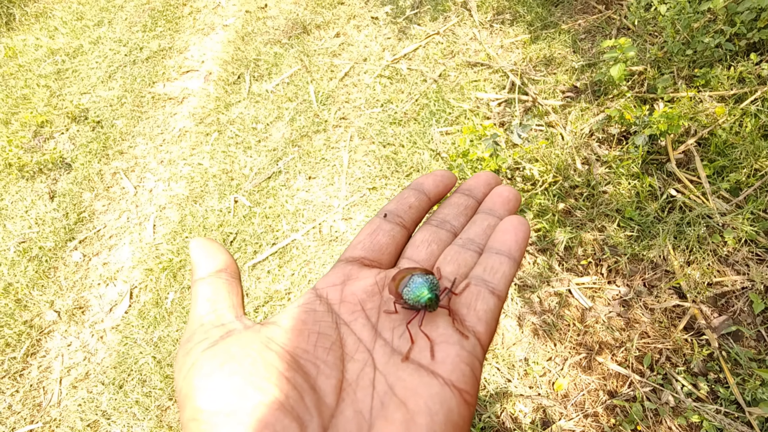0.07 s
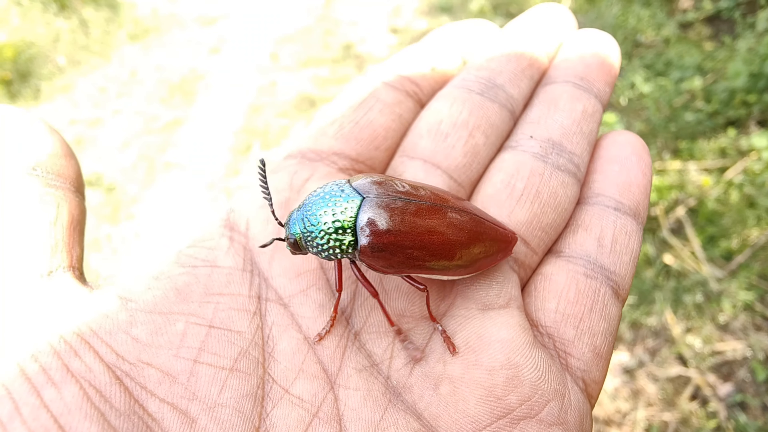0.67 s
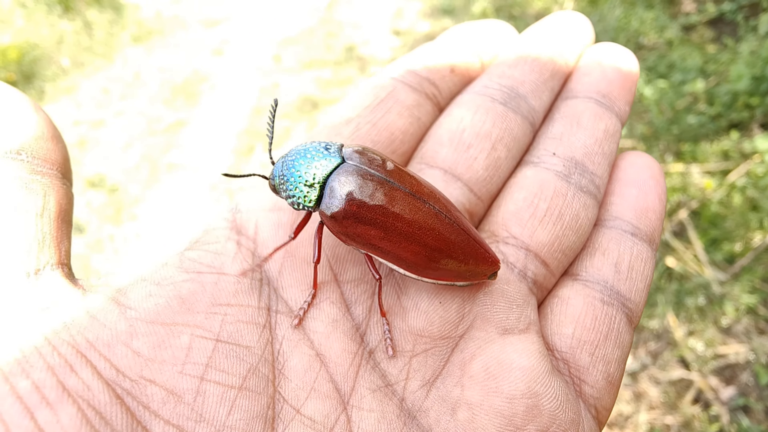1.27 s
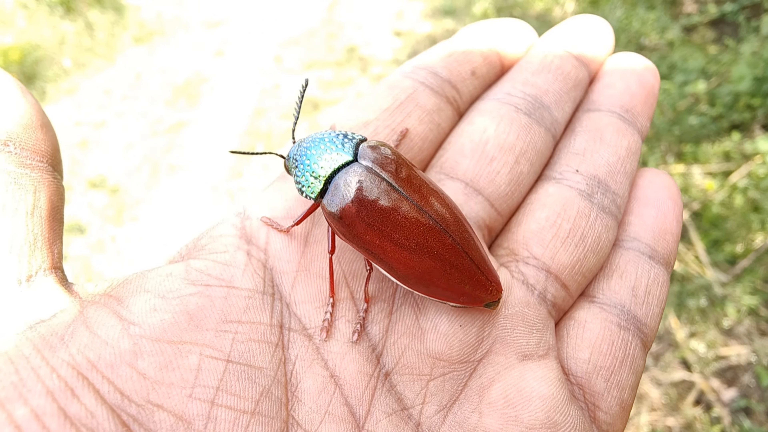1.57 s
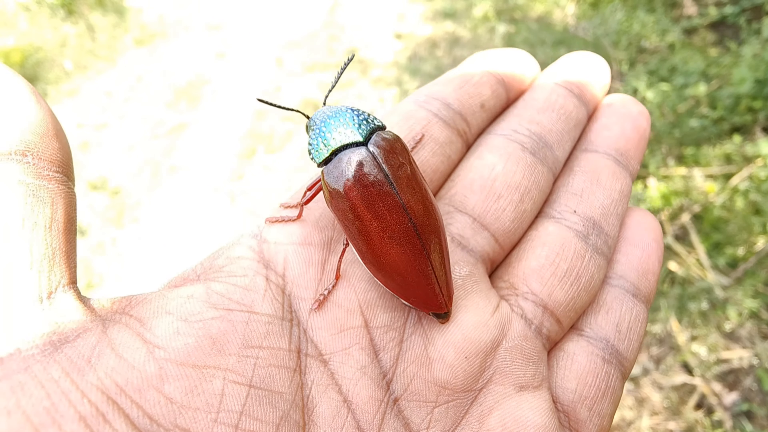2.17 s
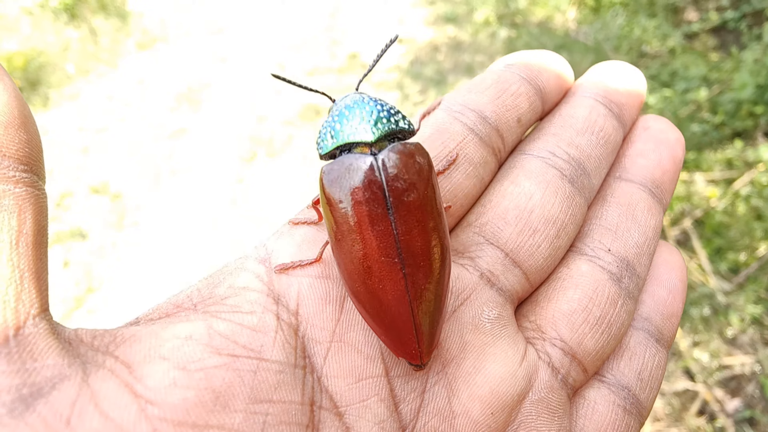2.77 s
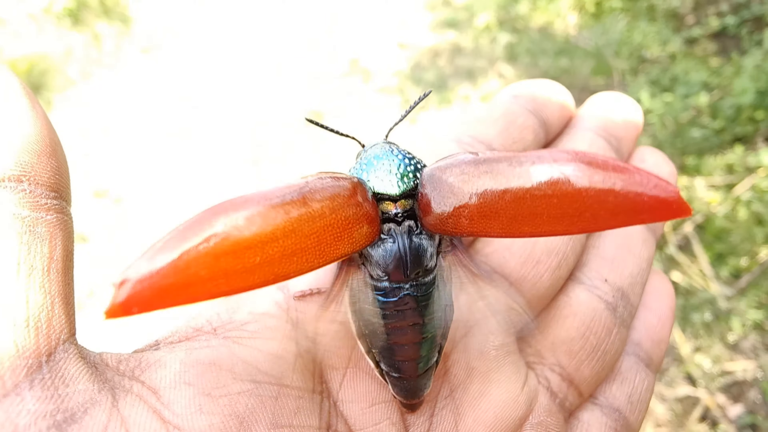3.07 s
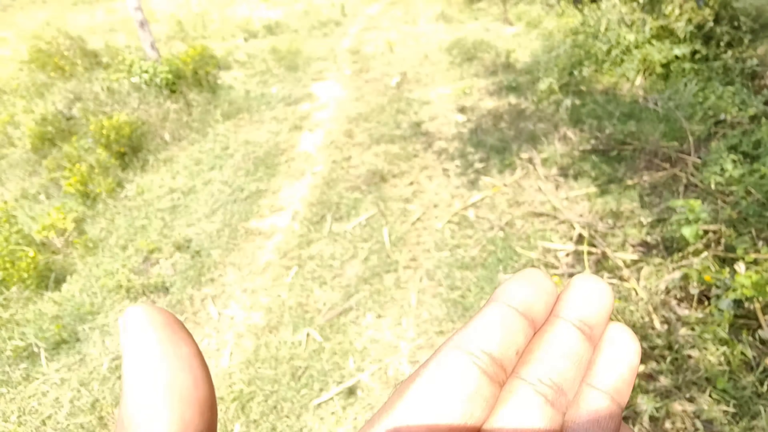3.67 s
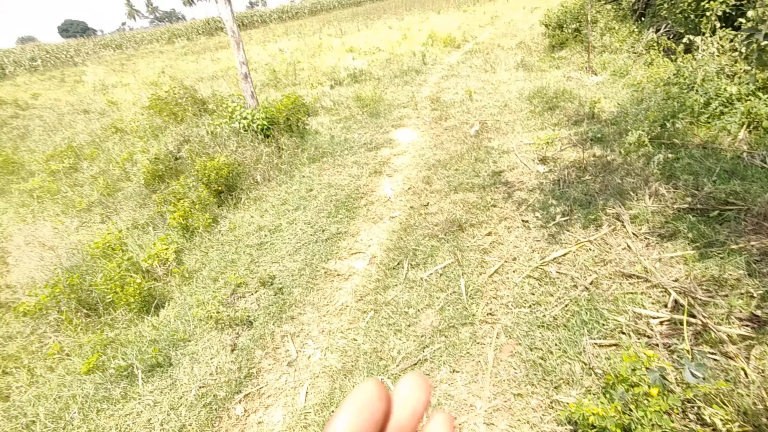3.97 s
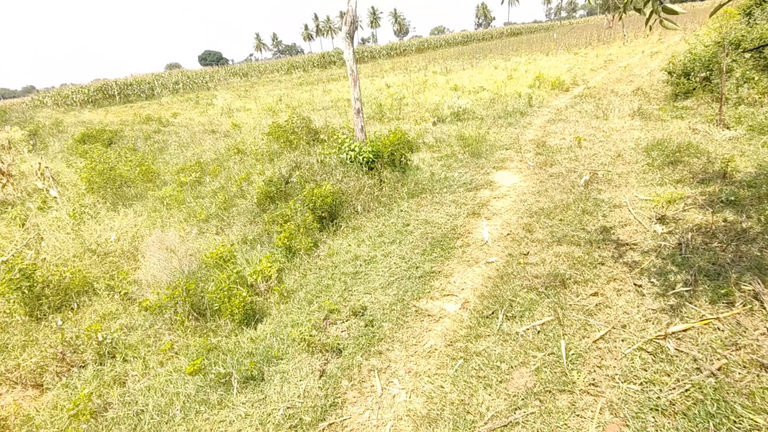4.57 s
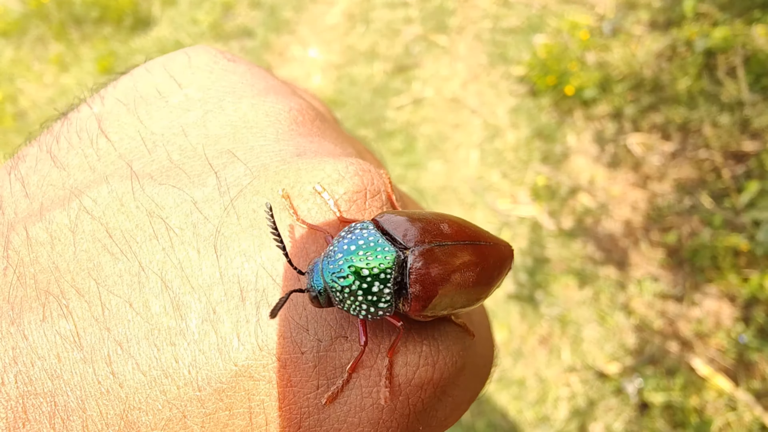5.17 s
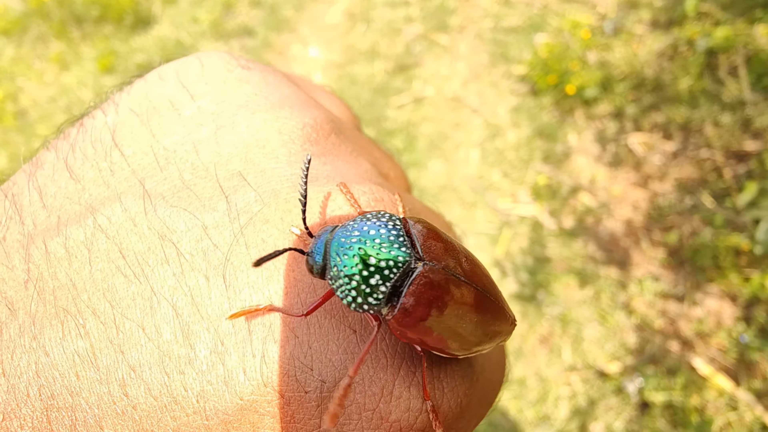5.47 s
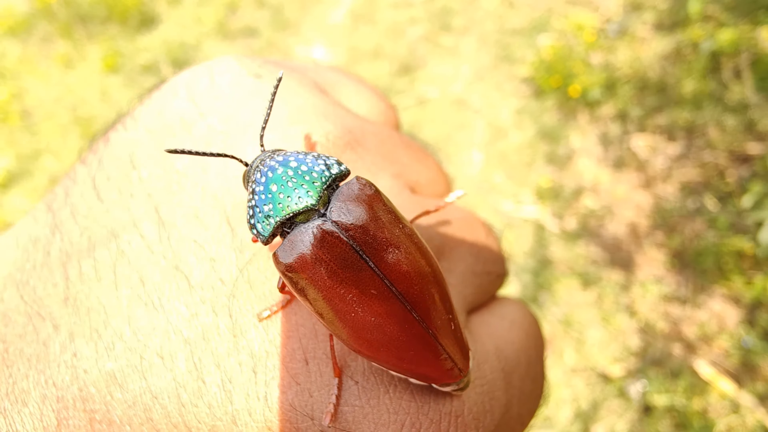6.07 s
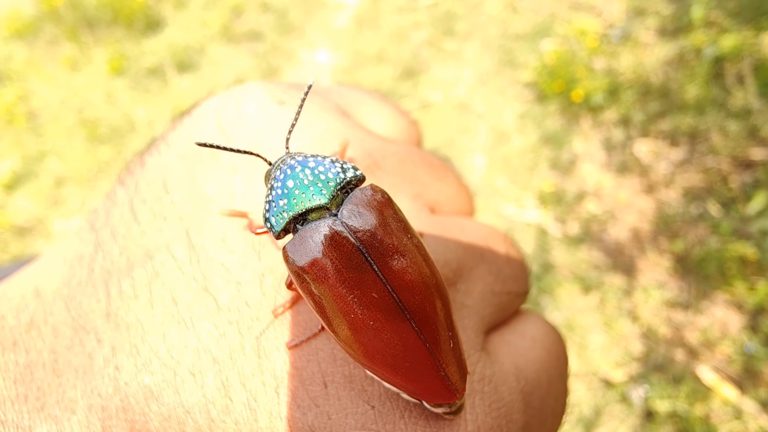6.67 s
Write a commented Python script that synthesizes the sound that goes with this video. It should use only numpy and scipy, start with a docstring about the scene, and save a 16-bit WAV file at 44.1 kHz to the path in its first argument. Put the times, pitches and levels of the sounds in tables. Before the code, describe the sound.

A cricket and far birds call faintly in the open air, with light wind rumble. Midway, a few crisp clicks lead into the close, rasping whirr of a big beetle taking flight, which quickly recedes to the left. Wind thumps unevenly on the microphone, mixed with brief finger rubs and bumps on the right, then eases back toward the quiet of the field.

```python
"""A large beetle opens its wing cases on a palm, whirrs past the microphone and flies off over a field.
Each wingbeat radiates a pressure pulse and rasps at its two reversals; both fade with distance.
A faint flight hum is also heard at the very start. Turbulent wind and rubbing, knocking fingers
disturb the two microphone ports, while a cricket and far birds call over the quiet air."""
import sys
import numpy as np
from scipy import signal
from scipy.fft import rfft, irfft, next_fast_len
from scipy.io import wavfile
from scipy.ndimage import uniform_filter1d, map_coordinates

SR = 44100
rng = np.random.default_rng(int(sys.argv[2]) if len(sys.argv) > 2 else 0)


def transcribe(signal):
    """Save signal, clipped to [-1, 1], as a 16-bit WAV file at the path in sys.argv[1]."""
    frames = np.atleast_2d(signal).T
    limited = np.clip(frames, -1, 1)
    pcm = np.round(limited * 32767).astype(np.int16)
    wavfile.write(sys.argv[1], SR, pcm)


N = 300321
T = np.arange(N) / SR


def amp(db):
    """Amplitude ratio of a level in decibels."""
    return 10 ** (np.asarray(db) / 20)


def unit(x):
    """Normalises a signal to rms 1."""
    return x / np.sqrt(np.mean(x ** 2) + 1e-20)


def level_at(spectrum, hz):
    """Interpolates a spectrum over log frequency."""
    known_hz, db = np.transpose(spectrum)
    return np.interp(np.log(hz + 1), np.log(known_hz + 1), db)


def curves(rows):
    """Interpolates each column of a table over the times in its first."""
    times, *columns = np.transpose(rows)
    return [np.interp(T, times, column) for column in columns]


def during(rows):
    """A gate open for the time span of a table, with short fades."""
    start, end = rows[0][0], rows[-1][0]
    return np.interp(T, [start - .01, start, end, end + .006], [0, 1, 1, 0])


def envelope(start, length, attack_s, release_s):
    """Rises linearly until start, holds for length, then decays exponentially."""
    rise = np.clip(1 + (T - start) / attack_s, 0, 1)
    return rise * np.exp(-np.clip((T - start - length) / release_s, 0, 20))


def pan(balance_db):
    """Two gains of mean 1; balance is the level of the left port over the right."""
    left = np.atleast_1d(amp(balance_db))
    return 2 * np.array([left, np.ones_like(left)]) / (1 + left)


def noise(spectrum, shared=0., balance=((100, 0), (1000, 0))):
    """Partly coherent coloured noise at two ports; their average has rms 1."""
    size = next_fast_len(N, True)
    hz = np.fft.rfftfreq(size, 1 / SR)
    white = rfft(rng.standard_normal((3, size)))
    ports = np.sqrt(shared) * white[2] + np.sqrt(1 - shared) * white[:2]
    coloured = irfft(ports * amp(level_at(spectrum, hz)) * pan(level_at(balance, hz)), size)[:, :N]
    return coloured / coloured.mean(0).std()


def wander(per_s):
    """A random fluctuation of rms 1, drawn anew per_s times a second and interpolated."""
    knots = rng.standard_normal(N // 8)
    return unit(np.interp(T * per_s, np.arange(len(knots)), knots))


def add(mix, start, sound):
    """Superposes a stereo sound on the mix from start, in seconds."""
    part = mix[:, max(round(start * SR), 0):][:, :sound.shape[1]]
    part += sound[:, :part.shape[1]]


def flap(tone, beat_hz, aspect, phase, size=1024):
    """Directivity: each beat is a minimum-phase pulse shaped by aspect, 0 from above to 1 from behind."""
    hz, tone = np.arange(size // 2 + 1) * beat_hz, np.array(tone)
    above_db, behind_db = level_at(tone[:, :2], hz), level_at(tone[:, ::2], hz)
    shapes = []
    for share in np.linspace(0, 1, 10):
        log_gain = np.log(amp((1 - share) * above_db + share * behind_db))
        mirrored = np.r_[log_gain, log_gain[-2:0:-1]]
        partials = np.exp(np.conj(signal.hilbert(mirrored)))[:len(hz)]
        shapes.append(unit(irfft(partials * (hz > 0) * (hz < tone[-1, 0]), size)))
    shape_index = np.clip(aspect, 0, 1) * (len(shapes) - 1)
    return map_coordinates(np.array(shapes), [shape_index, phase * size], order=1, mode="nearest")


def wings(flying, beat_hz, aspect, hum_db, push_db, rasp_db, tone, rasp_tone, *, lag_s, rattle_db,
          hum_pan_db, push_pan_db, rasp_pan_db, rasp_shared, width_beats, upstroke, steady):
    """Beating wings radiate a harmonic hum, push air in the near field and rasp at each reversal."""
    # Wings brushing the raised cases. Each row: frequency in Hz, relative density in dB.
    rattle_tone = [(1500, -16), (2500, -7), (3000, -5), (3900, -15), (4700, -19), (8000, -31)]
    # Direction of the membranes' rasp. Each row: frequency in Hz, balance in dB.
    rasp_balance = [(1000, 15.5), (2400, 3), (4400, 0), (8100, 11.5), (15000, 3.5)]
    full_stroke_hz, crackle_db, octave_db = 71, 4, -22
    beats = np.cumsum(beat_hz * (1 + .002 * wander(60) * flying)) / SR
    phase = beats % 1
    # No two beats flex the wing alike.
    hum = flap(tone, beat_hz.mean(), aspect + .03 * wander(70), phase) * amp(hum_db + .4 * wander(70))
    push = unit(np.cos(2 * np.pi * beats) + amp(octave_db) * np.cos(4 * np.pi * beats)) * amp(push_db)
    # The lower reversal snaps only once the wings swing fully.
    downstroke = np.clip(1 + (beat_hz - full_stroke_hz) / 8, 0, 1)
    lower = downstroke * np.exp(-.5 * (((phase + .5) % 1 - .5) / width_beats) ** 2)
    upper = upstroke * np.exp(-.5 * ((phase - .5) / width_beats) ** 2)
    bursts = steady + lower + upper
    crackle = unit(amp(crackle_db * wander(2500)))
    rasp_gain = bursts / bursts.mean() * crackle * amp(rasp_db + .63 * wander(140))
    # The papery rattle carries upwards more than backwards.
    rattle = noise(rattle_tone, rasp_shared) * amp(rattle_db - 10 * aspect)
    rasp = (noise(rasp_tone, rasp_shared, rasp_balance) + rattle) * rasp_gain
    # A close hum favours the left port; far off it is heard more evenly.
    closeness = amp(.93 * (hum_db - hum_db.max()))
    ports = rasp * pan(rasp_pan_db) - hum * pan(hum_pan_db * closeness) - push * pan(push_pan_db)
    left, right = flying * ports
    return np.array([left, map_coordinates(right, [(T - lag_s) * SR])])


def far_flight():
    """Periodic wing strokes some way off radiate a faint hum that soon stops."""
    # The flight. Each row: time in seconds, beat rate in Hz, level in dB, aspect from 0 to 1.
    flight = [(0, 66.6, -53, 0), (.24, 66.8, -56.5, .09), (.35, 66.4, -59.5, .98), (.43, 66, -71, .8)]
    # Stroke spectrum. Each row: frequency in Hz, relative dB from above, relative dB from behind.
    tone = [(66, 1, -26), (133, -3, -24), (198, -2.5, -15), (265, 2.5, -9), (336, -3, -6.5),
            (400, -13.5, -22), (475, 3.5, -11), (520, 3, 5.5), (606, -10, -25), (730, -50, -11),
            (1800, -35, -20), (2450, -18, -18), (3100, -32, -31), (5000, -30, -25)]
    # Membrane noise. Each row: frequency in Hz, relative density in dB.
    rasp_tone = [(900, 0.5), (1900, -11), (2450, 5), (3100, -19), (4400, -6), (6200, -9.5), (8000, -7.5),
                 (12000, -13), (15800, -24)]
    beat_hz, hum_db, aspect = curves(flight)
    push_db, rasp_db = hum_db - 20, hum_db - 10
    return wings(during(flight), beat_hz, aspect, hum_db, push_db, rasp_db, tone, rasp_tone,
                 lag_s=-.00027, rattle_db=-23, hum_pan_db=2, push_pan_db=-6, rasp_pan_db=-7,
                 rasp_shared=.11, width_beats=.041, upstroke=.16, steady=.23)


def open_air(hush_db=-68.5):
    """Broadband ambient noise: a steady hush and a far breeze that slowly swells and sinks."""
    # Quiet air and the breeze. Each row: frequency in Hz, relative density in dB.
    hush_tone = [(88, -34), (150, -8), (361, -6.5), (817, -15), (2630, -14), (5000, -19), (5410, -22),
                 (6700, -24), (14600, -27), (15800, -22)]
    breeze_tone = [(150, 10), (400, 8.5), (800, 5.5), (1200, 0.5), (2500, -19)]
    # Strength of the breeze. Each row: time in seconds, level in dB.
    breeze_level = [(0, -67), (2.9, -65), (4.5, -61.5), (5.4, -68.5)]
    # Direction of the hush. Each row: frequency in Hz, balance in dB.
    balance = [(300, 5.5), (800, -2), (2400, -2), (8000, 3.5), (15000, -1.5)]
    hush = noise(hush_tone, .056, balance) * amp(hush_db + .5 * wander(39))
    breeze = noise(breeze_tone, shared=.31) * amp(curves(breeze_level)[0] + wander(6.7))
    return hush + breeze * pan(-3)


def cricket(pitch_hz=5400, sag_hz=400, strokes_per_s=35, level_db=-62.5, fade_db_per_s=1.8):
    """Stridulation: four wing strokes make a chirp, each sagging in pitch, the last one weak."""
    # Runs of chirps. Each row: start, end and period in seconds, level in dB relative to the first run.
    runs = [(.005, .6, .177, 0), (.734, 1, .176, -5), (1.162, 3, .192, -2.5), (4.585, 5.35, .221, -3.5),
            (5.435, 6.2, .171, -4.5), (6.33, 6.8, .205, -7)]
    out = np.zeros((2, N))
    stroke = np.arange(0, 4, strokes_per_s / SR)
    tooth_jitter_hz = 55 * wander(700)
    swell = np.sin(np.pi * stroke) ** 2 * np.interp(stroke, [0, 2.6, 4], [.9, 1, .3])
    for start, end, period, db in runs:
        for onset in np.arange(start, end, period):
            jitter_hz = tooth_jitter_hz[int(onset * SR / 2):][:len(stroke)]
            hz = pitch_hz + sag_hz * (.5 - stroke % 1) + jitter_hz
            gain = amp(level_db + db - fade_db_per_s * (onset - start))
            add(out, onset, gain * pan(0) * swell * np.sin(2 * np.pi * np.cumsum(hz) / SR))
    return out


def scatter(calls, wet_db, t60_s):
    """Reverberation: bushes and ground scatter distant calls into an exponentially decaying tail."""
    t = np.arange(SR // 2) / SR
    tail = rng.standard_normal((2, len(t))) * amp(-60 * t / t60_s)
    tail /= np.linalg.norm(tail[0])
    return calls + amp(wet_db) * signal.fftconvolve(calls, tail, axes=1)[:, :N]


def wind(draught_rumble_db=-47.5, draught_buffet_db=-64.5, swell_db=-.36, swells_per_s=5.4):
    """Turbulence at the ports rumbles and buffets; gusts and a light draught add in power."""
    # Gusts. Each row: start and length in seconds, then rumble, buffeting and balance in dB.
    gusts = [(0.309, 0.21, -36.5, -57, 19), (1.196, 0.23, -47, -80, 6), (1.552, 0.058, -39, -74, 19),
             (2.619, 0.078, -40.5, -57, 11), (2.911, 0.14, -43.5, -61, 11), (3.498, 0.049, -33, -47, 20.5),
             (3.584, .15, -23.5, -30, 26), (3.949, 0.49, -37.5, -61, 14), (4.04, 0.0083, -31, -32, 29),
             (4.103, 0.044, -29, -43.5, 28), (4.186, 0.0098, -30.5, -39.5, 25), (4.28, 0.051, -30, -39, 28),
             (4.503, 0.11, -28.5, -50, -14), (4.904, 0.11, -23.5, -37.5, 10), (4.945, 0.026, -34, -25, 28),
             (5.015, 0.018, -16, -28, 13.5), (5.086, 0.056, -27.5, -30, -13),
             (5.123, 0.025, -22.5, -39, 13), (5.179, 0.028, -18, -27.5, -3.5),
             (5.221, 0.083, -33.5, -43, 4.5), (5.492, 0.25, -46, -82, 28), (5.874, 0.05, -32, -45, 26),
             (5.944, 0.15, -36, -60.5, 26), (6.12, 0.092, -43.5, -73, 16)]
    # Low rumble and brighter buffeting. Each row: frequency in Hz, relative density in dB.
    rumble_tone = [(10, -6.5), (25, 2.5), (45, -1.5), (65, -5.5), (100, -20), (200, -43.5), (500, -86)]
    buffet_tone = [(30, -47), (70, 1.5), (110, 3.5), (180, -4.5), (280, -19.5), (450, -29), (900, -87),
                   (2000, -85)]
    swell = amp(swell_db * np.array([wander(swells_per_s), wander(swells_per_s)]))
    rumble_power = (amp(draught_rumble_db) * swell) ** 2
    buffet_power = (amp(draught_buffet_db) * swell) ** 2
    for start, length, rumble_db, buffet_db, balance_db in gusts:
        power = (pan(balance_db) * envelope(start, length, attack_s=.014, release_s=.019)) ** 2
        rumble_power += amp(rumble_db) ** 2 * power
        buffet_power += amp(buffet_db) ** 2 * power
    eddies = np.array([noise(rumble_tone, shared=.41), noise(buffet_tone, shared=.045)])
    # The eddies are evened out, so that the gusts set their strength.
    rumble, buffet = eddies / np.sqrt(uniform_filter1d(eddies ** 2, size=3000, axis=-1) + .06)
    return rumble * np.sqrt(rumble_power) + buffet * np.sqrt(buffet_power)


def birds(waver=.0364, chorus_db=-80, chorus_count=30):
    """Frequency-modulated tones: short wavering slurs over a random chorus of fainter ones."""
    # Far calls. Each row: start and length in seconds, first and last pitch in Hz, level in dB.
    slurs = [(0.449, 0.045, 2820, 2590, -65), (1.019, 0.05, 1730, 2070, -66),
             (1.464, 0.065, 2400, 2235, -68), (1.703, 0.061, 2406, 1990, -65.5),
             (1.722, 0.077, 2020, 1620, -67), (2.06, 0.025, 1376, 1460, -64.5),
             (4.403, 0.027, 2830, 2430, -60), (4.62, 0.14, 2220, 2430, -65.5),
             (4.73, 0.063, 3090, 3240, -64.5), (5.154, 0.085, 3560, 3720, -67),
             (5.559, 0.071, 2590, 2425, -54.5), (5.79, 0.034, 2215, 2300, -65.5),
             (5.834, 0.082, 2446, 2770, -66), (5.878, 0.037, 5100, 5000, -67),
             (6.543, .06, 3270, 2840, -72)]
    out, wobble = np.zeros((2, N)), wander(300)
    chorus = []
    for when, duration, pitch, glide in rng.random((chorus_count, 4)):
        hz = 1800 + 2000 * pitch
        chorus.append((when * (T[-1] - .2), .03 + .04 * duration, hz, hz * (.88 + .24 * glide), chorus_db))
    for start, length, first_hz, last_hz, db in slurs + chorus:
        n = int(length * SR)
        hz = np.linspace(first_hz, last_hz, n) * (1 + waver * wobble[int(start * SR):][:n])
        slur = np.sin(2 * np.pi * np.cumsum(hz) / SR) * signal.windows.tukey(n, .7)
        add(out, start, amp(db) * pan(0) * slur)
    return out


def handling(slip_db=4):
    """Stick-slip friction of a finger over the right port, and soft pushes on the microphone body."""
    # Finger strokes. Each row: start and length in seconds, level in dB.
    rubs = [(4.45, 0.44, -65.5), (4.481, 0.022, -35), (4.525, .014, -33), (4.577, 0.0052, -38.5),
            (4.617, 0.0028, -49), (4.716, 0.0074, -50.5), (4.762, .006, -52), (4.835, 0.0062, -43.5)]
    # Friction noise. Each row: frequency in Hz, relative density in dB.
    rub_tone = [(80, 17), (250, 11.5), (900, 0.5), (1500, -5.5), (2300, -14.5), (5000, -25.5), (8000, -39),
                (15000, -41)]
    # Pushes. Each row: start in seconds, peak in dB, time constant in seconds, balance in dB.
    bumps = [(0.505, -30.5, 0.0023, 17), (2.142, -32.5, 0.0031, -24), (4.038, -15.5, 0.0036, 32),
             (4.52, -16, 0.00042, -31), (4.617, -19.5, 0.0023, -30), (4.77, -25, 0.0023, -28),
             (5.009, -37, 0.0015, 11), (5.873, -33, 0.0029, 18), (6.203, -27.5, 0.0027, 32)]
    pressure = sum(amp(db) * envelope(start, length, attack_s=.0072, release_s=.0077)
                   for start, length, db in rubs)
    out = noise(rub_tone) * pressure * amp(slip_db * wander(400)) * pan(-37)
    for start, db, time_constant, balance_db in bumps:
        age = T[:SR // 10] / time_constant
        push = age ** 2 * (3 - age) * np.exp(-age)
        add(out, start, -amp(db) * pan(balance_db) * push / push.max())
    return out


def whistles():
    """Pure tones of steady pitch: thin calls from far across the field."""
    # Calls. Each row: start and length in seconds, pitch in Hz, level in dB.
    notes = [(0.755, .15, 4900, -78), (1.99, 0.21, 4935, -75.5)]
    out = np.zeros((2, N))
    for start, length, hz, db in notes:
        t = np.arange(int(length * SR)) / SR
        add(out, start, amp(db) * pan(0) * np.sin(2 * np.pi * hz * t) * signal.windows.tukey(len(t), .5))
    return out


def snaps(rows, size=4096):
    """Band-limited transients: each is an impulse followed by a decaying scatter of smaller slips."""
    out, hz = np.zeros((2, N)), np.fft.rfftfreq(size, 1 / SR)
    lead = size // 8  # room for the filter to ring ahead of the impulse
    for time, db, centre_hz, octaves, decay_s, balance_db in rows:
        slips = .38 * rng.standard_normal((2, size)) * np.exp(-T[:size] / decay_s)
        slips[:, 0] = .95
        band = np.exp(-.5 * (np.log2((hz + 1) / centre_hz) / octaves) ** 2)
        tick = irfft(rfft(np.roll(slips, lead, axis=1)) * band)
        add(out, time - lead / SR, amp(db) * pan(balance_db) * tick / abs(tick).max())
    return out


def finger_knocks():
    """Brief impacts of the fingers give knocks and dry ticks."""
    # Each row: time in seconds, peak in dB, centre in Hz, width in octaves, decay in seconds,
    # balance in dB.
    knocks = [(1.068, -48.5, 6000, 0.56, .0003, 9), (1.29, -46.5, 4870, 0.57, .002, 15),
              (4.484, -31, 1380, 0.43, 0.00026, -31), (4.52, -19, 900, 0.56, 0.00044, -30),
              (4.573, -27, 4100, 0.78, 0.00022, -24), (4.581, -23, 3240, 0.45, 0.00038, -38),
              (4.618, -37.5, 2890, 0.97, 0.002, -21), (4.827, -33, 3460, 0.78, 0.00052, -29),
              (5.318, -33, 1390, 1.5, 0.000043, 21), (6.179, -43, 5700, 0.73, 0.00087, 14),
              (6.288, -33, 1200, 0.77, 0.00011, -27)]
    return snaps(knocks)


def scraping(grain_db=4.5):
    """Dry friction of claws and skin: noise made grainy by fast amplitude modulation."""
    # Scrapes. Each row: start and length in seconds, level in dB.
    scrapes = [(2.546, 0.11, -72.5), (2.815, 0.092, -65.5), (4.378, 0.011, -62), (4.404, 0.34, -68),
               (4.761, 0.15, -65.5)]
    # Friction noise. Each row: frequency in Hz, relative density in dB.
    tone = [(1000, -22), (2300, -4), (3100, 1.5), (5000, -2), (8000, -8), (11000, -15), (15800, -13)]
    pressure = sum(amp(db) * envelope(start, length, attack_s=.012, release_s=.0091)
                   for start, length, db in scrapes)
    return noise(tone) * unit(amp(grain_db * wander(500))) * pressure * pan(.67)


def wing_cases():
    """Sudden release: the cases unlatch and the wings unfold with bright clicks."""
    # Each row: time in seconds, peak in dB, centre in Hz, width in octaves, decay in seconds,
    # balance in dB.
    clicks = [(2.848, -47, 5000, .7, .002, 6), (2.882, -45.5, 7743, 0.24, 0.0047, 13),
              (3.016, -42.5, 5030, 0.97, 0.00084, 8), (3.042, -32, 7300, 0.33, .003, 24),
              (3.054, -25.5, 7400, 0.72, 0.002, 6), (3.071, -23.5, 6900, 0.57, 0.0021, 21)]
    return snaps(clicks)


def take_off(lift_off_s=3.186, palm_distance_m=.11, acceleration_m_per_s2=4.64):
    """Spherical spreading: as the beetle speeds away, hum and rasp fall as 1/r, the near field faster."""
    # Wingbeat. Each row: time in seconds, rate in Hz.
    beat = [(3.04, 59.2), (3.11, 63), (3.162, 73.5), (3.256, 71.0), (3.384, 70.2), (3.7, 69.7),
            (4.09, 71.6), (4.3, 70.7), (4.48, 71.7)]
    # The wings flutter, then swing fully. Each row: time in seconds, stroke size in dB.
    swing = [(3.045, -30.5), (3.075, -14.5), (3.125, -14.5), (3.155, -4), (3.2, -2.5)]
    # How the beetle is turned. Each row: time in seconds, aspect from 0 (above) to 1 (behind).
    aspect = [(3.14, 0.28), (3.22, 0), (3.31, 0.91), (3.38, 0.92), (3.8, 1), (4.0, 0.81), (4.25, 0.38),
              (4.48, 0.96)]
    # The beetle veers left. Each row: time in seconds, lag of the right port in seconds.
    port_lag = [(3.3, 0.00028), (3.47, 0.0003), (3.7, 0.00036)]
    # Stroke spectrum. Each row: frequency in Hz, relative dB from above, relative dB from behind.
    tone = [(70.4, 2, -30), (136, 7.5, 4.5), (214, 10, -2.5), (274, -8, 8), (333, 6.5, 0), (432, -10, 1.5),
            (455, -3, -2), (532, -9, -3.5), (656, -24, -22), (880, -30, -19), (1090, -43, -13.5),
            (1300, -37, -9), (1860, -37, -37), (3000, -56, -45), (5000, -51, -55)]
    # Membrane noise. Each row: frequency in Hz, relative density in dB.
    rasp_tone = [(200, 9), (500, 4), (900, -5.5), (1400, -3), (2000, -0.5), (3000, -2), (3600, -7.5),
                 (4400, -4.5), (5500, 0.5), (6700, -9.5), (8100, -0.5), (9500, -8), (12000, -11.5),
                 (15800, -13.5)]
    swing_db = curves(swing)[0]
    travel_m = .5 * acceleration_m_per_s2 * np.maximum(T - lift_off_s, 0) ** 2
    spreading_db = 20 * np.log10(np.hypot(1, travel_m / palm_distance_m))
    clash_db = 8 * np.exp(-.5 * ((T - 3.16) / .032) ** 2)  # the first full strokes brush the cases
    hum_db = -24 + 1.85 * swing_db - spreading_db
    push_db = -19 + swing_db - 4.6 * spreading_db
    rasp_db = -40 + .41 * swing_db + clash_db - spreading_db
    return wings(during(beat), curves(beat)[0], curves(aspect)[0], hum_db, push_db, rasp_db, tone,
                 rasp_tone, lag_s=curves(port_lag)[0], rattle_db=-4.5, hum_pan_db=11.5, push_pan_db=15.5,
                 rasp_pan_db=-1, rasp_shared=.33, width_beats=.086, upstroke=.69, steady=.3)


def scene():
    """Superposition of the beetle, wind and fingers with the sounds of the open field."""
    beetle = take_off() + far_flight() + wing_cases()
    air = open_air()
    chirps = scatter(cricket(), wet_db=-1, t60_s=.15)
    calls = scatter(birds() + whistles(), wet_db=1, t60_s=.17)
    return beetle + wind() + handling() + finger_knocks() + scraping() + air + chirps + calls


def record(dry, edge_hz=15900):
    """A linear-phase low-pass filter sets the recorder's band limit."""
    low_pass = signal.firwin(511, edge_hz, window=("kaiser", 9), fs=SR)
    return signal.oaconvolve(dry, low_pass[None], "same")


dry = scene()
out = record(dry)
transcribe(out)
```